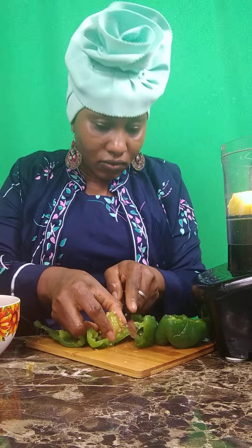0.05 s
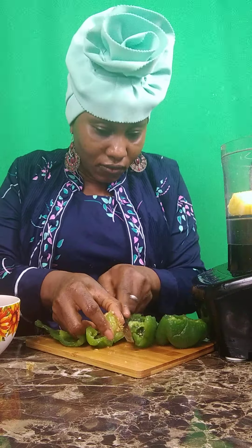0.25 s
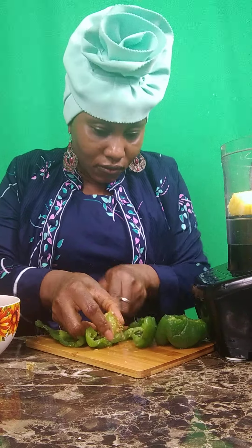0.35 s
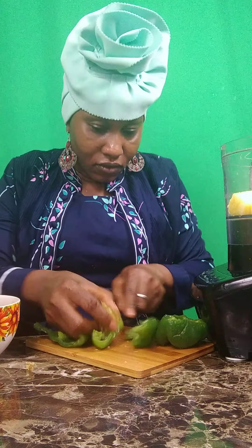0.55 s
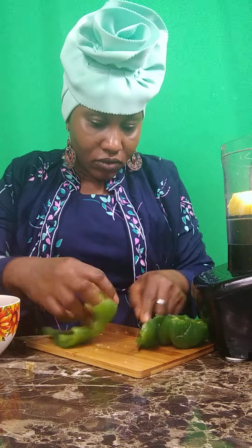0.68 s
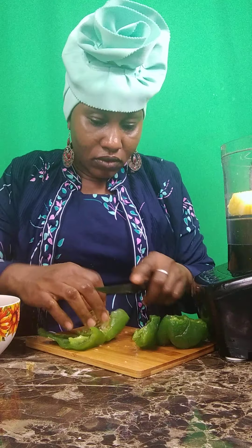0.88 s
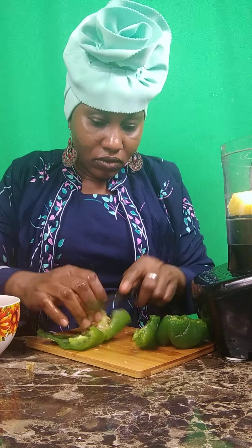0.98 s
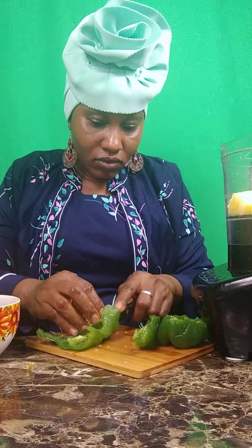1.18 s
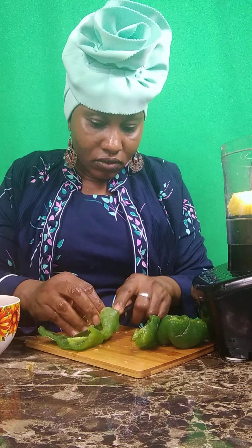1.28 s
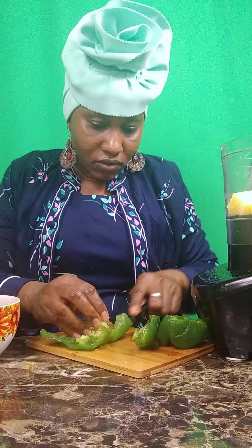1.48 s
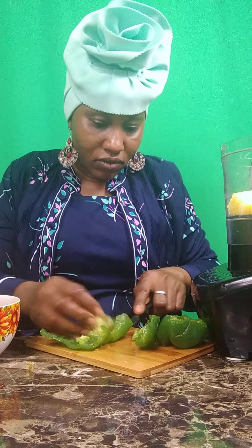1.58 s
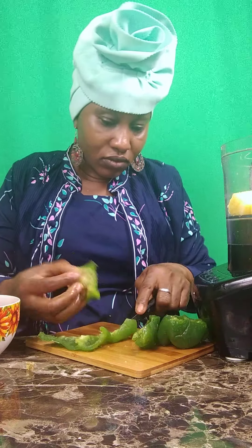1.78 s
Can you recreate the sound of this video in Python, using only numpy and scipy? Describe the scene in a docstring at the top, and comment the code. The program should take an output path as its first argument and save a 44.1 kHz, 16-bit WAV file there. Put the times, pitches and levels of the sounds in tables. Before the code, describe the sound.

Close by in a quiet room, a pepper is broken apart on a wooden board: a sharp crunch, lighter crackling with soft low bumps on the microphone, a brief lull, then more tearing and a faint scrape.

```python
"""A green pepper is cut and pulled apart on a wooden board in a small quiet room.
The blade bites and the wall fractures in a quick run of cracks, each a single impulse. Tearing the
flesh and dragging the piece over the board give shot noise, a dense train of tiny pulses; then the
piece is lifted. The board's resonances and the room's reflections colour and prolong these sounds.
Soft low bumps reach the right microphone; dull noise and a faint mains hum lie under everything."""
import sys
import numpy as np
from scipy import signal
from scipy.fft import rfft, irfft
from scipy.io import wavfile

SR = 44100
rng = np.random.default_rng(int(sys.argv[2]) if len(sys.argv) > 2 else 0)


def master_out(mix):
    """Clip the mix to full scale and print it as 16-bit PCM to the path in sys.argv[1]."""
    frames = np.transpose(np.atleast_2d(mix))
    ceiling = np.clip(frames, -1, 1)
    pcm = np.round(ceiling * 32767).astype(np.int16)
    wavfile.write(sys.argv[1], SR, pcm)


N = 81585
T = np.arange(N) / SR
FFT_SIZE = 2 ** 17
HZ = np.maximum(np.arange(FFT_SIZE // 2 + 1) * SR / FFT_SIZE, 1)


def wall_cracks():
    """Brittle fracture: each crack of the wall is an impulse, and the briefer it is, the brighter."""
    # cracks and small ticks of the wall: time_s, level_db, cutoff_hz
    cracks = [(0.222, -33.5, 1910), (0.376, 5, 3800), (0.3775, -2, 9000), (0.3786, 1.5, 3400),
              (0.3803, 4, 1400), (0.3821, -6, 2000), (0.3899, -4.5, 1400), (0.5505, -21, 2790),
              (0.5545, -27, 1770), (0.697, -32.5, 2000), (1.334, -50.5, 7060), (1.357, -46, 6000),
              (1.708, -46, 1800)]
    # spectrum common to all cracks: frequency_hz, level_db
    crack_spectrum = [(80, -17.5), (180, -5), (300, 2.5), (450, -9), (650, -16.5), (900, -8), (1250, -4),
                      (1600, 3), (1920, -1.5), (2180, -14.5), (2450, 1.5), (2950, -4), (3300, -30.5),
                      (3900, -38), (4800, -11), (5500, -26), (6400, -8), (7800, -38), (9500, -40.5),
                      (15000, -55)]
    pulses = np.zeros(N)
    for time_s, level_db, cutoff_hz in cracks:
        impulse = np.zeros(N)
        impulse[int(time_s * SR)] = amp(level_db)
        pulses += signal.sosfilt(signal.butter(2, cutoff_hz, fs=SR, output="sos"), impulse)
    return coloured(pulses, curve(crack_spectrum))


def flesh_strokes():
    """Source and filter: fibres yield under each stroke, exciting a rasp, a fizz and a dull knocking."""
    # strokes through and over the flesh: start_s, attack_s, hold_s, release_s,
    # rasp_db, peak_hz, boost_db, tilt_db_per_octave, fizz_db, knock_db
    strokes = [(0.261, 0.035, 0.023, 0.028, -58, 1200, 3, 0, -77, -60),
               (0.304, 0.039, 0.056, 0.0074, -48, 1200, 1.5, 1.5, -56, -47),
               (0.371, 0.0076, 0.0042, 0.11, -30.5, 1500, 5, -1.5, -46.5, -42),
               (0.421, 0.013, 0.028, 0.024, -47, 1480, -12.5, 0, -61, -46),
               (0.521, 0.025, 0.018, 0.065, -45.5, 2400, 9, 1, -65.5, -60.5),
               (0.545, 0.059, 0.049, 0.036, -50, 1904, 16, -5, -61, -62),
               (0.617, 0.026, 0.058, 0.021, -42.5, 1730, 14, -5, -88, -62),
               (1.375, 0.048, 0.011, 0.022, -58.5, 2280, -1, 9.5, -72.5, -56.5),
               (1.421, 0.011, 0.026, 0.025, -47, 2460, 8, 1, -59.5, -47),
               (1.443, 0.025, 0.019, 0.035, -41.5, 2660, 4.5, 0, -52, -44),
               (1.480, 0.022, 0.034, 0.067, -33, 1224, 5.5, 0.5, -52.5, -55.5),
               (1.533, 0.026, 0.024, 0.013, -43.5, 1070, 5, -8.5, -57, -45.5),
               (1.702, 0.0063, 0.05, 0.081, -53.5, 990, 4, -2, -91.5, -61),
               (1.725, 0.039, 0.012, 0.046, -51.5, 966, 5, -1.5, -101.5, -68.5)]
    # spectrum of tearing flesh: frequency_hz, level_db
    rasp_spectrum = [(120, -9), (300, -5.5), (520, -1), (680, -0.5), (850, 5), (1100, 0), (1550, -4),
                     (1950, -4.5), (2200, -7), (2550, -4.5), (2950, -15), (3300, -26.5), (4200, -45),
                     (8000, -75)]
    # spectrum of bursting cells: frequency_hz, level_db
    fizz_spectrum = [(1500, -17), (3200, 3), (3900, 0), (4800, 3), (6500, 1), (8000, -15.5), (11000, -22.5),
                     (13000, -30.5), (15500, -41.5)]
    # spectrum of the board under the hand: frequency_hz, level_db
    knock_spectrum = [(60, -45), (130, -7), (190, -8.5), (250, 5.5), (310, -0.5), (380, -6.5), (500, -11.5),
                      (900, -50.5)]
    peak_width_octaves = 0.25
    rasp, fizz, knock = np.zeros((3, 2, N))
    for start, attack, hold, release, rasp_db, peak_hz, boost_db, tilt, fizz_db, knock_db in strokes:
        rise = np.clip((T - start) / attack, 0, 1)
        fall = np.clip(1 - (T - start - attack - hold) / release, 0, 1) ** 2.03
        force = rise * fall
        ruptures = force * fibre_ruptures()
        octaves = np.log2(HZ / peak_hz)
        slope_db = tilt * np.clip(octaves, -2, 2)
        peak_db = boost_db * np.exp(-0.5 * (octaves / peak_width_octaves) ** 2)
        rasp += amp(rasp_db) * coloured(ruptures, curve(rasp_spectrum) + slope_db + peak_db)
        fizz += amp(fizz_db) * ruptures
        knock += amp(knock_db) * force * fibre_ruptures()
    return rasp + coloured(fizz, curve(fizz_spectrum)) + coloured(knock, curve(knock_spectrum))


def fibre_ruptures():
    """Shot noise: tiny ruptures of random time and size, partly coherent between the two sides."""
    rate_per_s, spread_db, incoherent_share = 2600, 2.5, 0.36
    sizes = amp(spread_db * np.minimum(rng.exponential(1, (2, N)), 4))
    signs = rng.choice([-1, 1], (2, N))
    left, independent = sizes * signs * (rng.random((2, N)) < rate_per_s / SR)
    right = np.sqrt(1 - incoherent_share) * left + np.sqrt(incoherent_share) * independent
    return np.array([left, right]) / left.std()


def thuds():
    """Damped oscillation: each soft contact starts a sinusoid that decays exponentially."""
    # knocks of the piece and the blade on the board: start_s, level_db, pitch_hz, t60_s
    contacts = [(0.378, -36, 150, 0.14), (0.550, -32.5, 801, 0.08), (1.463, -40, 135, 0.14),
                (1.471, -55, 150, 0.05)]
    rings = np.zeros(N)
    for start_s, level_db, pitch_hz, t60_s in contacts:
        age = np.maximum(T - start_s, 0)
        rings += amp(level_db - 60 * age / t60_s) * np.sin(2 * np.pi * pitch_hz * age)
    return rings


def board(drive):
    """Resonance: the board's modes lift and prolong the sound near their natural frequencies."""
    # modes of the board: pitch_hz, boost_db, t60_s
    modes = [(251.8, 9, 0.16), (372, 5, 0.06), (962, 3.5, 0.032), (1253, 4.5, 0.1), (1510, 7.5, 0.1),
             (1932, 8, 0.035), (2450, 1, 0.05)]
    sound = drive
    for pitch_hz, boost_db, t60_s in modes:
        radius = amp(-60 / (t60_s * SR))
        feedforward = np.array([1, 0, -1]) * (1 - radius ** 2) / 2
        feedback = [1, -2 * radius * np.cos(2 * np.pi * pitch_hz / SR), radius ** 2]
        sound = sound + (amp(boost_db) - 1) * signal.lfilter(feedforward, feedback, drive)
    return sound


def room(direct):
    """Reverberation: early reflections and a dull tail; the right microphone gets less midrange."""
    # response of the right microphone relative to the left: frequency_hz, gain_db
    right_gain = [(100, 1), (300, -7.5), (700, -3.5), (1200, -8), (1800, -12.5), (2600, -6.5), (5500, -14),
                  (7500, -18.5), (9500, 2.5), (15000, 1)]
    # phase lag of the direct sound on the right: frequency_hz, lag_rad
    right_phase = [(0, -0.5), (430, 1.08), (850, 2.5), (1150, 0.83), (1550, 1.04), (1950, -2), (2240, 0.63),
                   (2760, 4), (6000, 3.5)]
    early_db, early_t60_s = -10, 0.056
    tail_db, tail_t60_s, tail_cutoff_hz = -13.5, 0.29, 2600
    right_reverb_db = 1.5
    lowpass = signal.butter(4, tail_cutoff_hz, fs=SR, output="sos")
    reverb = []
    for side in direct:
        early = convolve(side, reflections(early_t60_s))
        tail = convolve(signal.sosfilt(lowpass, side), reflections(tail_t60_s))
        reverb.append(amp(early_db) * early + amp(tail_db) * tail)
    lag_rad = np.interp(HZ, *np.transpose(right_phase))
    right = filtered(direct[1], np.exp(-1j * lag_rad)) + amp(right_reverb_db) * reverb[1]
    return np.array([direct[0] + reverb[0], filtered(right, amp(curve(right_gain)))])


def reflections(t60_s, delay_s=0.002):
    """Diffuse decay: dense echoes form an impulse response of fading noise, with unit energy."""
    t = T[:SR // 2]
    echoes = rng.standard_normal(len(t)) * amp(-60 * t / t60_s) * (t > delay_s)
    return echoes / np.linalg.norm(echoes)


def low_bumps():
    """Slow pressure fluctuations: soft pulses and a rumble, at the right microphone only."""
    # pressure pulses: time_s, level_db, width_s
    bumps = [(0.219, -20, 0.009), (0.38, -28.5, 0.0018), (0.455, -26, 0.005), (0.583, -21, 0.0023),
             (0.659, -31.5, 0.0067), (0.693, -34, 0.004), (0.729, -29, 0.0022), (0.78, -24, 0.0079),
             (0.848, -23.5, 0.0024), (0.95, -32, 0.0033)]
    # envelope of the rumble: time_s, level_db
    rumble_envelope = [(0, -56.5), (0.3, -44), (0.45, -43), (0.8, -39), (1.0, -52), (1.35, -62.5),
                       (1.6, -46.5), (1.85, -43.5)]
    # spectrum of the rumble: frequency_hz, level_db
    rumble_spectrum = [(12, 11), (28, 20), (60, -8), (110, -19.5), (250, -64)]
    band_hz = [21, 150]
    pulses = sum(amp(db) * np.exp(-np.abs(T - time_s) / width_s) for time_s, db, width_s in bumps)
    pulses = signal.sosfilt(signal.butter(1, band_hz, "band", fs=SR, output="sos"), pulses)
    swell = amp(np.interp(T, *np.transpose(rumble_envelope)))
    rumble = swell * coloured(rng.standard_normal(N), curve(rumble_spectrum))
    return np.array([np.zeros(N), pulses + rumble])


def background():
    """Stationary noise floor: dull room noise, stronger on the left, and a pure tone of mains hum."""
    # spectrum of the room noise: frequency_hz, level_db
    air_spectrum = [(20, -1), (60, 0), (120, -7), (180, -7.5), (260, -5.5), (380, -6), (550, -16.5),
                    (900, -21.5), (1500, -21), (2200, -27.5), (2800, -37), (3300, -53), (5000, -56),
                    (6500, -50.5), (8000, -58), (15000, -57.5)]
    air_db, left_excess_db, stereo_width = -57.5, 4, 0.57
    hum_hz, hum_rms_db = 119.6, -64.5
    white = rng.standard_normal((2, FFT_SIZE))
    mid, side = filtered(white, amp(curve(air_spectrum)))
    left_right = np.array([[1], [-1]])
    air = (mid + stereo_width * side * left_right) * amp(left_right * left_excess_db / 2)
    hum = np.sqrt(2) * np.sin(2 * np.pi * hum_hz * T)
    return amp(air_db) * air / air.std() + amp(hum_rms_db) * hum


def amp(db):
    """Amplitude ratio of a level in decibels."""
    return 10 ** (np.asarray(db) / 20)


def curve(points):
    """A spectrum in dB, interpolated over logarithmic frequency."""
    hz, db = np.transpose(points)
    return np.interp(np.log(HZ), np.log(hz), db)


def filtered(x, transfer):
    """Linear filtering: the spectrum is multiplied by a transfer function."""
    return irfft(rfft(x, FFT_SIZE) * transfer)[..., :N]


def convolve(x, response):
    """Convolution with an impulse response, as a product of spectra."""
    return filtered(x, rfft(response, FFT_SIZE))


def coloured(x, spectrum_db):
    """Minimum-phase filtering: a causal response of unit energy imposes this spectral shape."""
    cepstrum = irfft(np.log(amp(spectrum_db)))
    cepstrum[1:FFT_SIZE // 2] *= 2
    cepstrum[FFT_SIZE // 2 + 1:] = 0
    response = irfft(np.exp(rfft(cepstrum)))[:FFT_SIZE // 16]
    return convolve(x, response / np.linalg.norm(response))


def scene():
    """Superposition: the pepper sounds through board and room, over the bumps and the background."""
    pepper = wall_cracks() + flesh_strokes() + thuds()
    return room(board(pepper)) + low_bumps() + background()


def record(dry):
    """Band limiting: a steep low-pass filter removes the top of the treble."""
    cutoff_hz = 15700
    return signal.sosfilt(signal.ellip(10, 0.2, 70, cutoff_hz, fs=SR, output="sos"), dry)


dry = scene()
out = record(dry)
master_out(out)
```